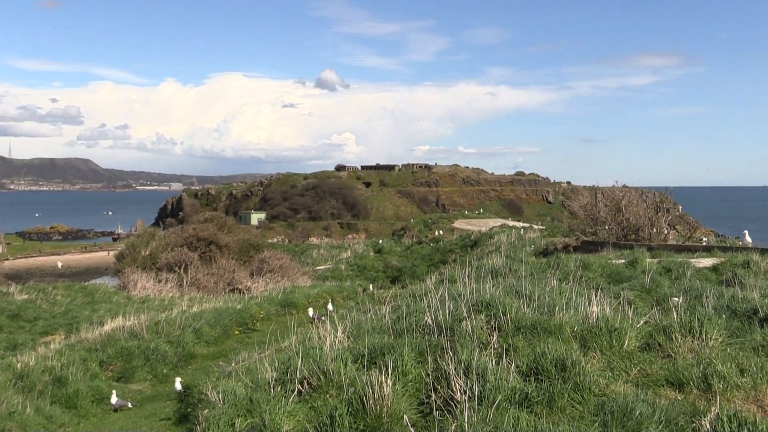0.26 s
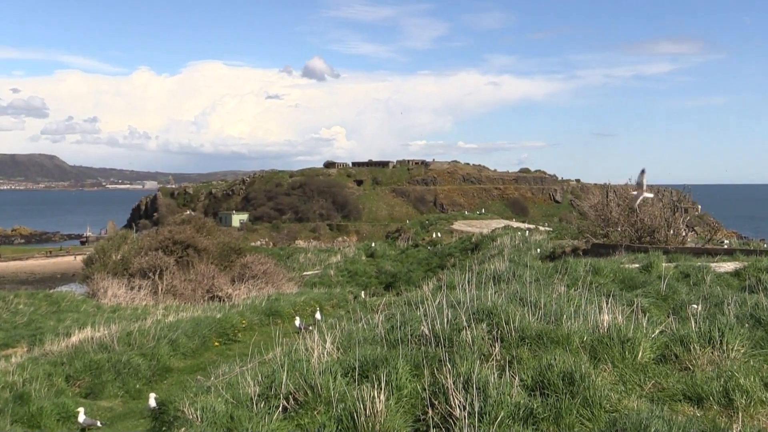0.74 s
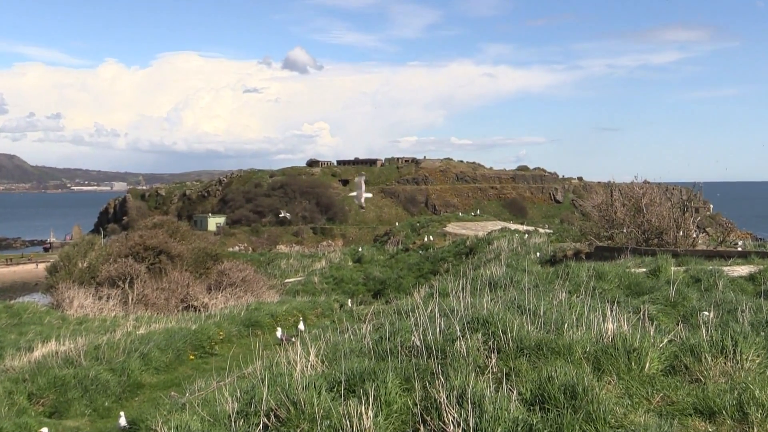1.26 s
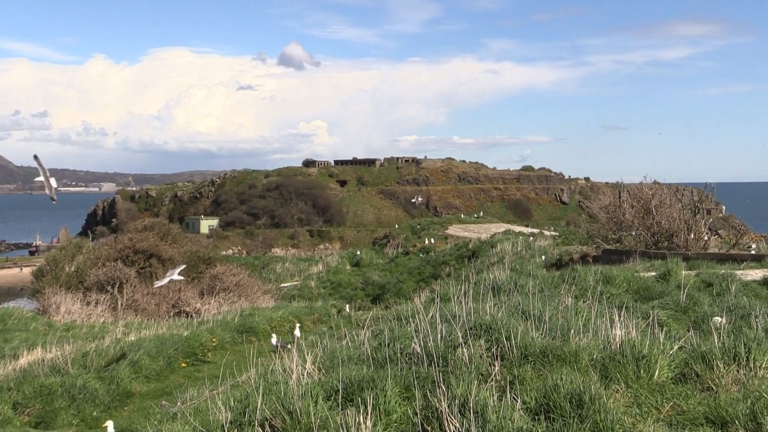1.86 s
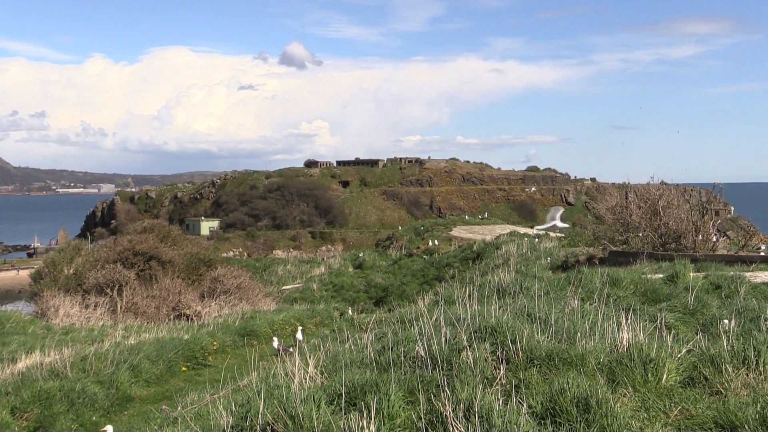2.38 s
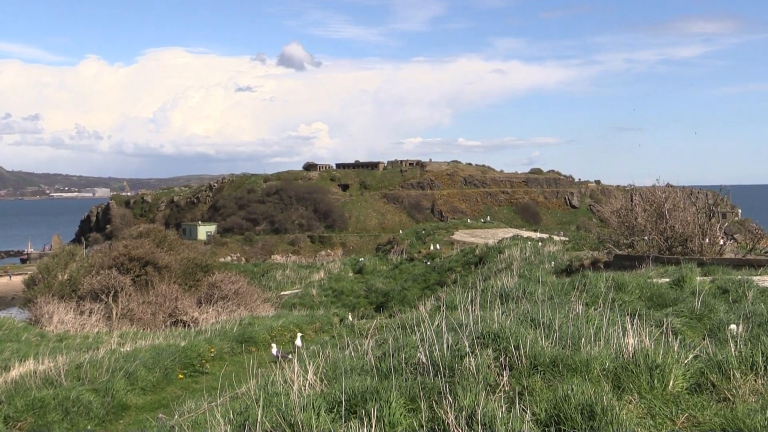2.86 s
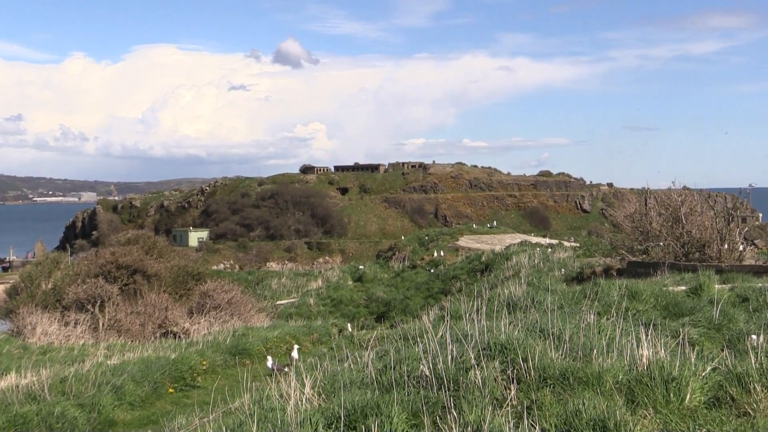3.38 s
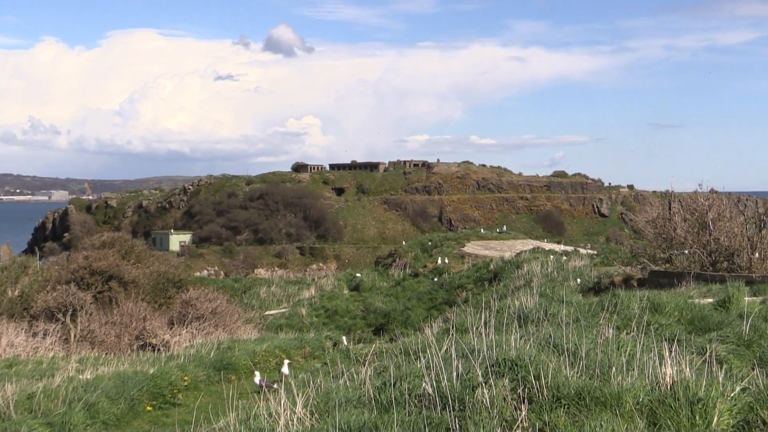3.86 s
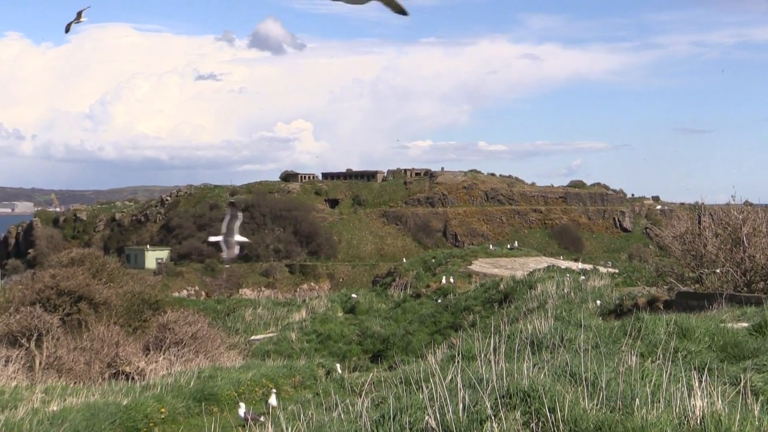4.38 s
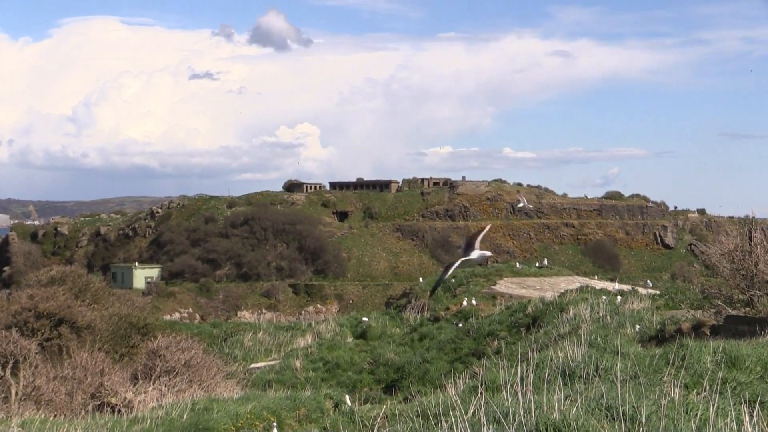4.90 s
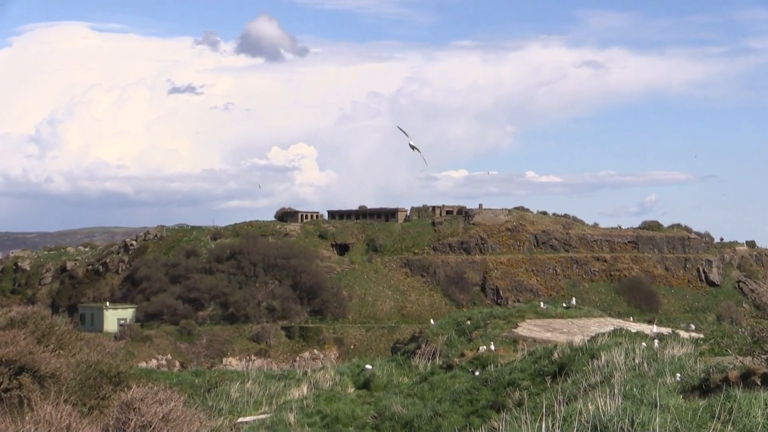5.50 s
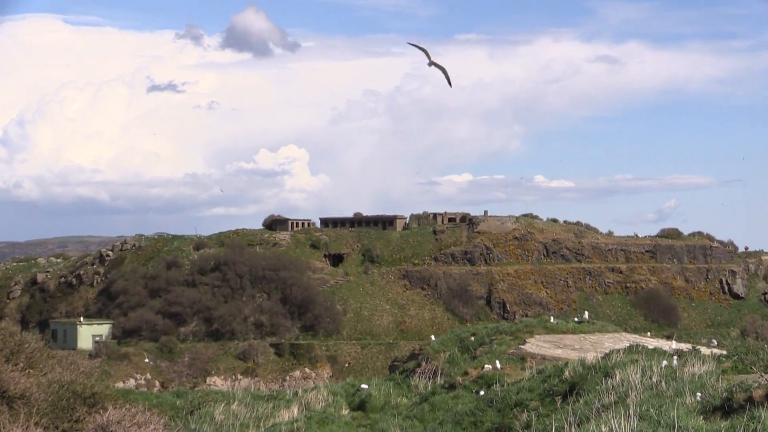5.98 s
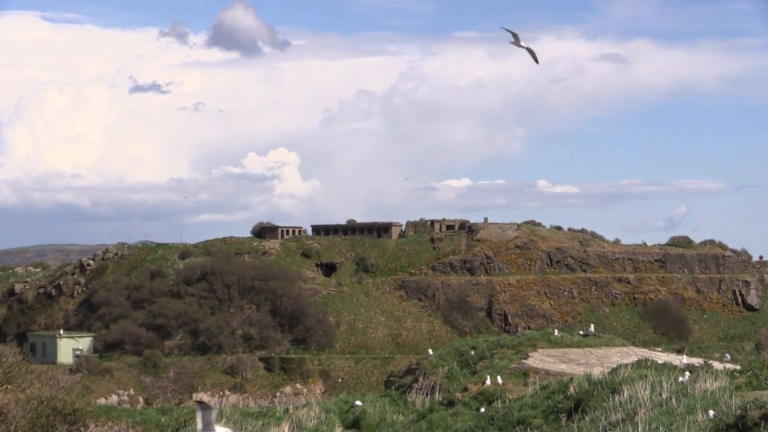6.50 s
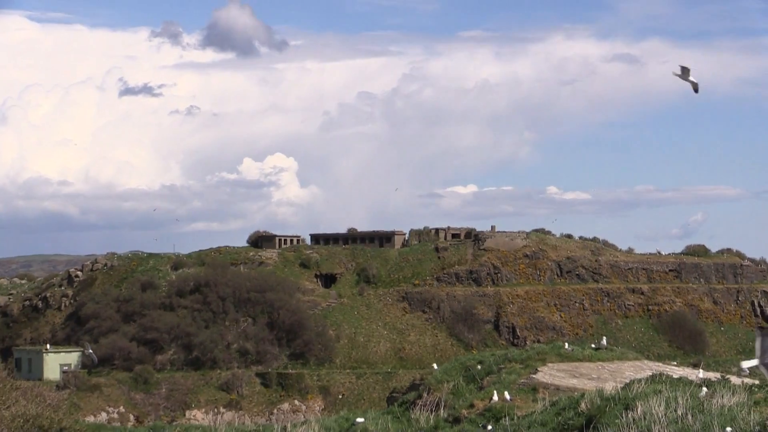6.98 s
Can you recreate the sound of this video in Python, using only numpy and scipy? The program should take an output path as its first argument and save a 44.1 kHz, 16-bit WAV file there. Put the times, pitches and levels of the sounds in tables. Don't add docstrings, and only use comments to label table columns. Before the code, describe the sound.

Low gusts buffet the microphone while a gull colony builds from faint cries to a dense overlapping chorus, with faint surf and grass hiss behind.

```python
import sys
import numpy as np
from scipy import signal
from scipy.fft import rfft, irfft
from scipy.io import wavfile
from scipy.ndimage import uniform_filter1d, minimum_filter1d

SR = 44100
rng = np.random.default_rng(int(sys.argv[2]) if len(sys.argv) > 2 else 0)


def to_linear_factor(level_db):
    exponent = np.asarray(level_db, float) / 20
    return 10 ** exponent


def transcribe(signal):
    frames = np.atleast_2d(signal).T
    limited = np.clip(frames, -1, 1)
    pcm = np.round(limited * 32767).astype(np.int16)
    wavfile.write(sys.argv[1], SR, pcm)


N = 319725


def level(x, db):
    return x * to_linear_factor(db) / np.sqrt(np.mean(x ** 2))


def colour(x, shape):
    hz, db = np.transpose(shape)
    bins = np.maximum(np.fft.rfftfreq(N, 1 / SR), 1)
    return irfft(rfft(x) * to_linear_factor(np.interp(np.log(bins), np.log(hz), db)), N)


def noise(shape):
    return level(colour(rng.standard_normal(N), shape), 0)


def walk(rate, count=N):
    hold = int(SR / rate)
    steps = rng.standard_normal(count // 64 + 1)[:count // hold + 1]
    return uniform_filter1d(np.repeat(steps, hold), hold)[:count]


def smear(x, t60_s):
    t = np.arange(2048) / SR
    paths = rng.standard_normal(len(t)) * np.exp(-np.log(1000) * t / t60_s)
    return signal.fftconvolve(x, paths / np.sqrt(np.sum(paths ** 2)))[:N]


# (frequency [Hz], level [dB])
THROAT = [(450, -42), (750, -18), (1000, -12.5), (1250, -4), (1700, -7), (2100, -11.5), (2600, -9.5),
          (3500, -5.5), (4200, -16), (5200, -26.5), (7000, -39), (10000, -60)]
JITTER = dict(chest=.003, broken=.006, head=.002, mew=.002, whistle=.003, arch=.008, squawk=.04, far=.012)
WARBLE = dict(squawk=.04, far=.015, broken=.012, arch=.008)
RATTLE = dict(chest=.05, broken=.12, head=.06, mew=.06, whistle=.15, arch=.08, squawk=.1, far=.1)
WEAK_ODD_DB = dict(chest=0, broken=-9, head=0, mew=0, whistle=0, arch=0, squawk=-6, far=-3)
TILT_DB = dict(chest=1, broken=0, head=-2, mew=-4, whistle=-26.5, arch=-7.5, squawk=-3.5, far=-8)
DULL_DB = dict(chest=-9, broken=-1.5, head=-19.5, mew=4, whistle=1, arch=-4, squawk=1, far=-7.5)
EFFORT = dict(mew=0.93, chest=0.4, arch=0.28)
# (frequency [Hz], level [dB])
BILL = dict(chest=(2750, 3), broken=(3500, 1.5), head=(2350, 4), mew=(2500, 1.5), whistle=(2000, .1),
        arch=(1620, 4), squawk=(1250, -4), far=(1500, 1.5))
DULL_HZ, PATCHY_DB = 4350, 3.5
SHUT_BILL_DB = -11
HOARSENING_PER_S = .3


def sing(out, points, kind, edge_s=.011):
    s, hz, db = np.transpose(points)
    first = max(int((s[0] - edge_s) * SR), 0)
    at = np.arange(first, min(int((s[-1] + edge_s) * SR), N))
    pitch, loud_db = np.interp(at / SR, s, hz), np.interp(at / SR, s, db)
    shake = walk(500, count=28672)[:len(at)]
    drift = walk(45, count=28672)
    unsteady = 1 + JITTER[kind] * shake + WARBLE.get(kind, 0) * drift[:len(at)]
    phase = 2 * np.pi * np.cumsum(pitch * unsteady) / SR

    k = np.arange(1, int(11000 / hz.max()) + 1)[:, None]
    overtone_hz, slow_db = k * pitch[::32], loud_db[::32]
    octaves = np.log2(overtone_hz / (hz.mean() if kind == "whistle" else 1200))
    own_db = 2.13 * rng.standard_normal(40)[k]
    own_db = own_db + PATCHY_DB * drift[(2 * (at[::32] - at[0]) + 1300 * k) % len(drift)]
    effort_db = .1 * (slow_db + 25) + EFFORT.get(kind, 0) * (slow_db - db.max())
    bill_hz, bill_peak_db = BILL[kind]
    bill_db = bill_peak_db * np.exp(-(np.log2(overtone_hz / bill_hz) / .18) ** 2)
    gains_db = (TILT_DB[kind] + effort_db) * np.clip(octaves, 0, 3)
    gains_db = gains_db + WEAK_ODD_DB[kind] * (k % 2) + own_db + bill_db
    gains_db = gains_db + DULL_DB[kind] * np.clip(np.log2(overtone_hz / DULL_HZ), 0, 2)
    gains = to_linear_factor(gains_db + SHUT_BILL_DB * (k == 3) * (kind == "mew"))

    throat_hz, throat_db = np.transpose(THROAT)
    throat = to_linear_factor(np.interp(np.log(k * hz.mean()), np.log(throat_hz), throat_db))
    gains = gains / np.sqrt(np.sum((gains * throat) ** 2, axis=0) / 2)
    gains = np.repeat(gains, 32, axis=1)[:, :len(at)]

    to_edge_s = np.minimum(at / SR - s[0], s[-1] - at / SR)
    fade = np.clip(to_edge_s / (2 * edge_s) + .5, 0, 1)
    depth = RATTLE[kind] * (1 + HOARSENING_PER_S * s[0])
    flutter = (1 + depth * shake[::-1]) / np.sqrt(1 + depth ** 2)
    out[at] += np.sum(gains * np.sin(k * phase), axis=0) * to_linear_factor(loud_db) * fade ** 2 * flutter


def sing_shaped(notes, shape, kind):
    out = np.zeros(N)
    for start, length, hz, db in notes:
        points = [(start + share * length, ratio * hz, db + rel_db) for share, ratio, rel_db in shape]
        sing(out, points, kind)
    return out


# (start [s], length [s], pitch [Hz], level [dB])
STEP_BIRD = [(1.627, 0.086, 551.4, -19.5), (1.858, .096, 514, -15), (2.089, 0.074, 512, -16.5),
             (2.31, .084, 497.6, -16), (2.545, 0.077, 518, -13), (2.767, .085, 524.3, -16),
             (2.996, .085, 511, -19.5), (3.222, 0.09, 510, -16.5), (3.447, 0.11, 504, -18),
             (3.703, .09, 517, -16), (4.183, 0.09, 505, -19.5), (4.702, 0.079, 520, -22),
             (4.973, 0.092, 520, -21), (5.254, 0.072, 520, -19), (7.038, 0.11, 592.7, -18),
             (4.442, 0.11, 516, -24), (5.535, 0.085, 510, -19), (5.796, 0.1, 522.5, -20),
             (6.081, .085, 508, -19.5), (6.352, .083, 497, -18.5), (6.627, 0.077, 495, -21.5),
             (4.334, .09, 600, -17.5), (4.581, 0.085, 598, -14.5), (4.825, .09, 597, -17),
             (5.088, 0.079, 623, -15), (5.347, .09, 602, -17.5), (5.636, 0.13, 572, -18),
             (3.948, 0.076, 509.7, -18.5)]
# (share of length [1], pitch ratio [1], level [dB])
STEP_SHAPE = [(-.35, .77, -14), (.05, .865, -10.5), (0.562, .905, -5), (0.68, 0.97, -2.5), (.85, .995, -4),
              (1.02, .9, -9.5), (1.14, 0.75, -20)]
# (start [s], length [s], top pitch [Hz], level [dB])
RISE_BIRD = [
    (0.699, 0.087, 515.5, -34.5),
    (0.963, 0.06, 480.5, -22.5),
    (1.181, 0.062, 487, -22),
    (1.405, .063, 484, -23),
    (3.842, 0.038, 520, -33.5),
    (4.115, 0.06, 535, -23),
    (6.488, 0.055, 546, -23.5),
    (6.756, 0.05, 515, -25.5),
    (7.2, .06, 520, -27),
]
# (share of length [1], pitch ratio [1], level [dB])
RISE_SHAPE = [(-.3, .8, -13), (.2, .91, -4), (.75, .965, -1), (1, 1.02, 0)]


def stepping_gulls():
    return sing_shaped(STEP_BIRD, STEP_SHAPE, "chest") + sing_shaped(RISE_BIRD, RISE_SHAPE, "chest")


# (start [s], length [s], pitch [Hz], level [dB])
ARCH_BIRD = [
    (1.305, 0.085, 560, -22),
    (1.518, .09, 550.5, -23),
    (1.745, 0.074, 543, -22),
    (1.973, 0.081, 533.4, -22.5),
    (2.198, .1, 552, -22.5),
    (2.426, 0.09, 563.6, -23.5),
    (2.67, 0.12, 550, -21.5),
    (2.917, 0.12, 516, -22.5),
    (1.068, .08, 579, -27),
]
# (share of length [1], pitch ratio [1], level [dB])
ARCH_SHAPE = [(-.2, .7, -15), (.2, .86, -5.5), (.48, .99, -0.5), (.72, 1.0, -6.5), (1, 0.93, -5.5)]
# (share of length [1], pitch ratio [1], level [dB])
FLIP_SHAPE = [(.42, 1.97, -5), (.7, 2.01, -1), (.92, 1.98, 0), (1.07, 1.88, -3)]


def arching_gull():
    return sing_shaped(ARCH_BIRD, ARCH_SHAPE, "arch") + sing_shaped(ARCH_BIRD[:6], FLIP_SHAPE, "head")


# (start [s], length [s], pitch [Hz], level [dB])
FALL_BIRD = [(2.68, .095, 1190, -18), (2.93, .112, 1237, -15.5), (3.19, .115, 1222, -15.5),
             (3.435, 0.13, 1216, -18), (3.688, .13, 1244, -16.5), (3.951, .12, 1239, -16.5),
             (4.225, 0.11, 1221, -16.5), (4.482, .105, 1244, -17.5), (4.748, 0.086, 1230, -16),
             (5.004, 0.085, 1238, -17), (5.263, 0.082, 1231, -17), (5.535, 0.065, 1208, -17),
             (5.786, 0.069, 1223, -16.5), (6.015, 0.085, 1203, -19.5), (6.288, .105, 1231, -17),
             (6.557, 0.13, 1246, -22), (6.835, 0.12, 1224, -25), (7.111, 0.14, 1255, -27.5)]
# (share of length [1], pitch ratio [1], level [dB])
FALL_SHAPE = [(-.18, .94, -17), (.02, 1.06, -12), (0.298, 1.045, -4.5), (0.75, .98, -0.5),
              (0.999, .9, -4.5)]
# (start [s], length [s], pitch [Hz], level [dB])
SLIDE_BIRD = [
    (4.151, 0.13, 1282, -17),
    (4.399, 0.11, 1270, -20),
    (4.658, 0.11, 1264, -21),
    (4.894, 0.15, 1293, -16),
    (5.152, .115, 1288, -12),
    (5.409, .11, 1270, -14),
    (5.688, 0.12, 1228, -14.5),
]
# (share of length [1], pitch ratio [1], level [dB])
SLIDE_SHAPE = [(0, 1.1, -8.5), (0.296, 1.015, -5.5), (0.749, .985, -5), (1, 0.88, -8)]


def mewing_gulls():
    return sing_shaped(FALL_BIRD, FALL_SHAPE, "mew") + sing_shaped(SLIDE_BIRD, SLIDE_SHAPE, "mew")


# (start [s], length [s], first pitch [Hz], last pitch [Hz], level [dB])
CHEST_GLIDES = [(.003, 0.15, 480, 500, -49.5), (0.137, 0.22, 706, 744, -42), (0.32, 0.035, 743, 664, -33),
                (0.346, 0.054, 713, 687, -35), (0.532, 0.21, 401, 453, -45),
                (3.556, 0.043, 550, 500, -30.5), (6.671, 0.077, 575, 520, -30.5),
                (6.982, 0.062, 404, 414, -31.5), (2.876, 0.039, 732, 688, -36.5)]
# (start [s], length [s], first pitch [Hz], last pitch [Hz], level [dB])
BROKEN_GLIDES = [(0.405, 0.06, 680, 602, -39.5), (0.776, 0.11, 675, 699, -36.5),
                 (1.104, 0.019, 574, 570, -38), (3.088, 0.055, 701, 740, -37),
                 (3.333, 0.12, 746, 804, -48.5), (3.618, 0.032, 683, 733, -48),
                 (4.167, 0.034, 694, 549, -22.5), (4.702, 0.027, 707, 565, -26.5),
                 (5.515, 0.029, 669, 673, -24), (6.27, 0.086, 629.4, 576, -21.5),
                 (6.561, 0.048, 609, 589, -16.5), (6.84, 0.045, 586, 556, -22)]
# (start [s], length [s], first pitch [Hz], last pitch [Hz], level [dB])
HEAD_GLIDES = [(0.461, 0.069, 1166, 1197, -27), (0.522, 0.024, 1180, 1080, -30),
               (0.788, 0.066, 1473, 1517, -35.5), (0.889, 0.064, 1217, 1186, -24),
               (1.011, 0.036, 1465, 1340, -21.5), (1.043, 0.032, 1185, 1088, -18),
               (1.107, 0.06, 1182, 1137, -28), (1.244, 0.016, 1390, 1370, -19),
               (1.267, 0.023, 1270, 1130, -16), (1.468, .045, 1209, 1090, -17.5)]
# (start [s], length [s], first pitch [Hz], last pitch
# [Hz], level [dB])
WHISTLE_GLIDES = [(.003, 0.2, 972, 1040, -44), (0.209, 0.14, 1037, 983, -47),
                  (.175, 0.049, 1770, 2150, -35.5), (.595, 0.03, 1120, 1160, -35),
                  (.72, 0.035, 1900, 2114, -29.5), (.245, 0.035, 1730, 2070, -32),
                  (.29, 0.095, 2083, 2040, -40), (.775, 0.105, 1940, 2100, -29),
                  (.885, 0.046, 1880, 1805, -30.5), (.003, 0.15, 4450, 4580, -63),
                  (.335, 0.037, 3600, 3460, -30.5), (.14, .2, 1423, 1470, -43.5),
                  (.2, .02, 1640, 2150, -37), (.45, .05, 1900, 1750, -39.5), (2.64, .06, 800, 980, -39),
                  (2.87, .08, 772, 1005, -39), (3.14, .07, 796, 1010, -41),
                  (2.282, 0.099, 1244, 1440, -41.5), (2.368, 0.17, 1437, 1319, -25),
                  (3.721, 0.2, 1453, 1813, -32.5), (3.951, 0.35, 1910, 1960, -34),
                  (4.659, 0.26, 1442, 1536, -31), (6.63, 0.087, 1840, 1430, -47),
                  (7.082, 0.14, 1623, 1320, -33), (.003, 0.13, 484, 504, -44.5),
                  (.003, 0.14, 3400, 3470, -47.5), (.15, 0.19, 4280, 4450, -58),
                  (.7, 0.08, 924, 1020, -44.5), (.52, .07, 810, 810, -43), (.615, .075, 867, 920, -40),
                  (.77, 0.02, 1053, 1386, -38), (.85, 0.033, 1364, 1097, -36),
                  (4.205, 0.035, 3640, 3340, -22), (4.46, 0.025, 3520, 3300, -22),
                  (4.72, 0.033, 3600, 3230, -23), (4.988, 0.022, 3600, 3180, -17.5),
                  (5.233, 0.026, 3530, 3215, -18.5), (5.488, 0.029, 3830, 3240, -30.5),
                  (6.31, 0.053, 3650, 3350, -33)]
# (start level [dB], end level [dB])
GLIDE_ENDS_DB = dict(chest=(-6, 4), broken=(-9.5, -0.5), head=(-3, 5), whistle=(-0.5, 3.5))


def gliding_gulls():
    out = np.zeros(N)
    for kind, notes in (("chest", CHEST_GLIDES), ("broken", BROKEN_GLIDES), ("head", HEAD_GLIDES),
                        ("whistle", WHISTLE_GLIDES)):
        start_db, end_db = GLIDE_ENDS_DB[kind]
        for start, length, hz0, hz1, db in notes:
            middle = (start + length / 2, (hz0 + hz1) / 2, db)
            sing(out, [(start, hz0, db + start_db), middle, (start + length, hz1, db + end_db)], kind)
    return out


# (start [s],
# end [s], level [dB])
SQUAWKS = [(0.853, 0.899, -26), (1.037, 1.071, -10), (1.14, 1.183, -23.5), (1.232, 1.296, -15.5),
           (1.392, 1.415, -19.5), (1.454, 1.509, -17.5), (1.607, 1.612, -14), (1.684, 1.75, -18.5),
           (1.82, 1.858, -19.5), (1.918, 1.98, -30), (2.065, 2.083, -31), (2.145, 2.178, -19),
           (2.274, 2.275, 1.5), (2.318, 2.489, -28), (2.451, 2.57, -18), (2.576, 2.64, -18),
           (2.714, 2.777, -16), (2.81, 2.869, -20.5),
           (2.867, 2.947, -28), (3.136, 3.19, -34.5), (3.843, 3.908, -36), (5.899, 5.995, -24.5),
                (2.943, 3.086, -22), (3.194, 3.335, -28.5), (3.433, 3.457, -13.5), (3.476, 3.564, -20),
                (3.676, 3.734, -25.5), (3.685, 3.779, -34), (3.894, 4.027, -17.5), (4.138, 4.287, -18),
                (4.341, 4.538, -16.5), (4.615, 4.773, -23.5), (4.679, 4.75, -16), (4.876, 4.944, -24.5),
                (4.867, 5.026, -17), (5.123, 5.264, -17.5), (5.277, 5.363, -22), (5.378, 5.546, -14.5),
                (5.688, 5.81, -17.5), (5.59, 5.672, -20), (5.963, 6.1, -16.5), (6.133, 6.187, -33.5),
                (6.231, 6.376, -15.5), (6.523, 6.671, -17), (6.685, 6.758, -31), (6.788, 6.951, -18),
                (7.01, 7.181, -23), (2.654, 2.7, -36), (2.91, 2.95, -31), (3.157, 3.218, -39),
                (3.323, 3.325, -25), (3.428, 3.443, -19), (5.895, 5.92, -27), (6.177, 6.229, -32),
                (6.426, 6.504, -36.5), (6.932, 6.966, -31.5), (0.16, 0.211, -43), (0.686, 0.723, -37),
                (7.176, 7.244, -30)]
# (share of length [1], pitch ratio [1], level [dB])
SQUAWK_SHAPE = [(0, 1.2, -5.5), (0.619, 0.87, -2), (0.999, 0.78, -8)]


def squawks():
    hoarse = np.zeros(N)
    pitches_hz = 615 * to_linear_factor(.5 * rng.standard_normal(64))
    for (start, end, db), hz in zip(SQUAWKS, pitches_hz):
        points = [(start + share * (end - start), ratio * hz, db + rel_db) for share, ratio, rel_db in SQUAWK_SHAPE]
        sing(hoarse, points, "squawk", edge_s=.02)
    return .55 * hoarse + smear(hoarse, t60_s=.024)


def near_gulls():
    voices = stepping_gulls() + arching_gull() + mewing_gulls() + gliding_gulls() + squawks()
    return colour(voices, THROAT)


# (peak time [s], level [dB])
RASPS = [(2.599, -61), (3.52, -62), (3.768, -74), (3.99, -69), (4.22, -61.5), (4.386, -53), (4.65, -62.5),
         (4.725, -61), (4.9, -58.5), (4.98, -59.5), (5.15, -64.5), (5.23, -58), (5.32, -72), (5.49, -55),
         (5.755, -52.5), (6.041, -56.5), (6.32, -64), (6.6, -54.5), (6.87, -65), (7.119, -70)]
# (frequency [Hz], level [dB per Hz])
RASP = [(4000, -25), (6000, 2.5), (7500, 2.5), (10000, -14), (13000, -20.5), (16000, -27.5)]
RASP_S, RASP_HZ, RASP_BITE = 0.031, 520, 3.2


def rasps():
    t = np.arange(N) / SR
    puffs = sum(to_linear_factor(db) * np.exp(-((t - s) / RASP_S) ** 2) for s, db in RASPS)
    return noise(RASP) * puffs * np.exp(RASP_BITE * (np.sin(2 * np.pi * RASP_HZ * t) - .5))


# (time [s], level [dB])
FAR = [(0, -55), (.5, -43), (.9, -33), (3.04, -29), (3.11, -31), (3.2, -25.5), (3.3, -24), (3.34, -44),
       (3.4, -39), (3.498, -28.5), (5.8, -30), (5.9, -32), (6.1, -29), (6.2, -29.5), (6.3, -24),
       (6.899, -32), (6.98, -35.5), (7.05, -31)]


def far_gulls(count=120):
    out = np.zeros(N)
    for when, size, tone, db in rng.random((count, 4)):
        s, span = when * N / SR, .05 + .05 * size
        hz = 509.5 * (.82 + .4 * tone)
        sing(out, [(s, .82 * hz, -32), (s + .4 * span, hz, -25 - 4 * db), (s + span, .9 * hz, -31)], "far")
    chorus = level(colour(out + smear(out, t60_s=.045), THROAT), 0)
    return chorus * to_linear_factor(np.interp(np.arange(N) / SR, *np.transpose(FAR)))


# (peak time [s], level [dB], swell [s], fade [s])
GUSTS = [(0.103, -10, 0.073, 0.44), (0.363, -7, 0.038, 0.28), (0.456, -7.5, 0.12, 0.083),
         (0.691, -10.5, 0.19, 0.087), (1.74, -23, 0.075, 0.025), (1.985, -9.5, 0.06, 0.33),
         (2.076, -7.5, 0.081, 0.17), (2.32, -17.5, 0.1, 0.14), (2.624, -8.5, 0.043, 0.17),
         (2.677, -8, 0.054, 0.041), (2.851, -13.5, 0.19, 0.049), (3.181, -5, 0.2, 0.27),
         (3.459, -7, 0.21, 0.22), (3.651, -6.5, 0.023, 0.044), (3.748, -8, 0.016, 0.13),
         (3.872, -8, 0.072, 0.016), (4.101, -10, 0.25, 0.2), (4.249, -11.5, 0.22, 0.093),
         (4.502, -14, 0.064, 0.54), (4.716, -11, 0.039, 0.23), (4.87, -9, 0.16, 0.091),
         (5.06, -19, 0.1, 0.52), (5.229, -13, 0.37, 0.084), (5.33, -25, 0.34, 0.12),
         (5.76, -18.5, 0.062, 0.034), (5.89, -17, 0.044, 0.14), (6.16, -18.5, 0.095, 0.053),
         (6.239, -13, 0.026, 0.15), (6.66, -15, 0.055, 0.04), (6.85, -20.5, 0.12, 0.74)]
GUST_DROP_DB, CALM_DB = 13.5, -49.5


def gust_level():
    t = np.arange(0, N + 64, 64) / SR
    power = to_linear_factor(2 * CALM_DB)
    for s, db, swell, fade in GUSTS:
        slope = np.maximum((s - t) / swell, (t - s) / fade)
        power = power + to_linear_factor(2 * (db - GUST_DROP_DB * slope))
    return np.interp(np.arange(N) / SR, t, 10 * np.log10(power))


# (frequency [Hz], level [dB per Hz])
BUFFET = [(8.8, -75), (15, -4), (49, -2), (79, -0.5), (138, -9), (380, -34.5), (700, -49), (910, -56),
          (1540, -120)]
CAPSULE_TOP = 0.93


def wind():
    gust_db = gust_level()
    lumps_db, eddies = 3.04 * walk(20), noise(BUFFET)
    low = signal.sosfilt(signal.butter(2, 110, fs=SR, output="sos"), eddies)
    high_db = 1.21 * gust_db + 2.5 + lumps_db + 0.89 * walk(28)
    thumps = low * to_linear_factor(gust_db + lumps_db) + (eddies - low) * to_linear_factor(high_db)
    return CAPSULE_TOP * np.tanh(thumps / CAPSULE_TOP)


# (frequency [Hz], level [dB per Hz])
SEA = [(40, -17.5), (76, 0.5), (120, -21), (300, -15.5), (700, -25.5), (2000, -25), (5000, -50),
       (15000, -75.5)]
# (time [s], level [dB])
SEA_RISE = [(0, -2.5), (.5, -1.5), (1.1, 2.5)]
SEA_DB = -35


def sea():
    rise_db = np.interp(np.arange(N) / SR, *np.transpose(SEA_RISE))
    surf = noise(SEA) * to_linear_factor(SEA_DB + rise_db + 0.24 * walk(1.1))
    return surf + to_linear_factor(-65.5) * rng.standard_normal(N)


def slope_echo(birds):
    t = np.arange(SR // 3) / SR
    scatter = rng.standard_normal(len(t)) * np.exp(-np.log(1000) * t / 0.3) * (t > .004)
    return to_linear_factor(-26) * signal.fftconvolve(birds, scatter / np.sqrt(np.sum(scatter ** 2)))[:N]


def scene():
    birds = near_gulls() + far_gulls()
    return (birds + slope_echo(birds) + rasps() + wind() + sea())[None]


def roll_off(x):
    return signal.sosfilt(signal.butter(12, 15720, fs=SR, output="sos"), x)


def record(dry):
    reach = 220
    needed = np.minimum(.89 / (np.abs(dry) + 1e-9), 1)
    gain = uniform_filter1d(minimum_filter1d(needed, 2 * reach), reach)
    return roll_off(dry * gain)


dry = scene()
out = record(dry)
transcribe(out)
```